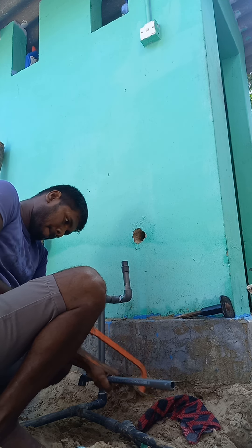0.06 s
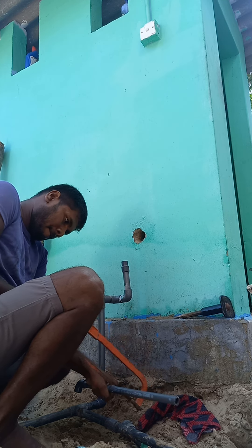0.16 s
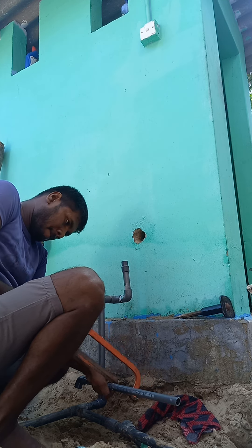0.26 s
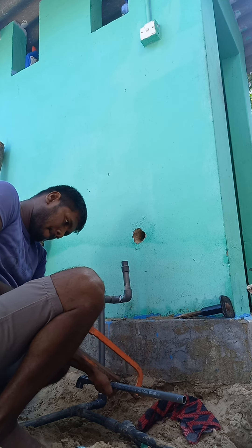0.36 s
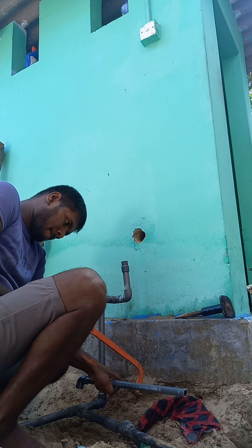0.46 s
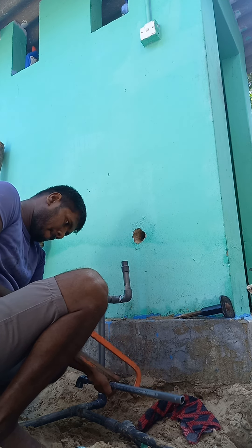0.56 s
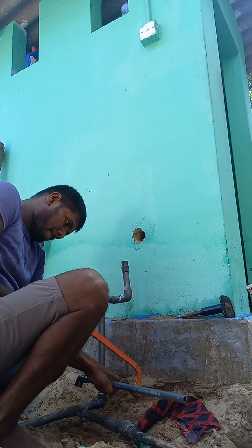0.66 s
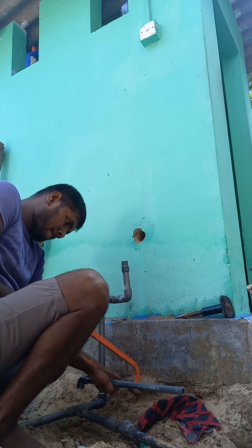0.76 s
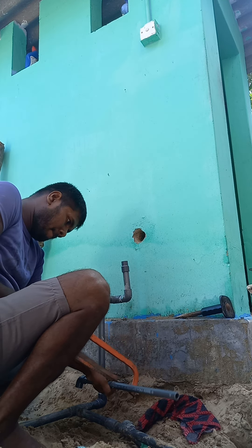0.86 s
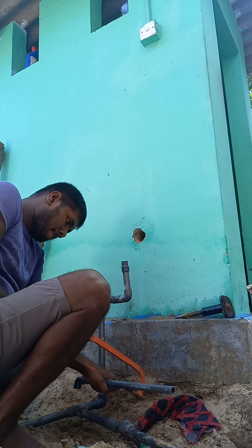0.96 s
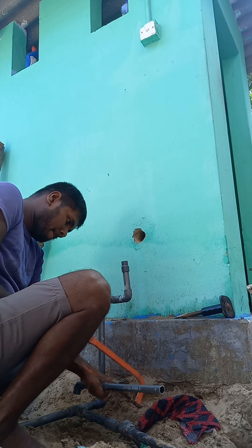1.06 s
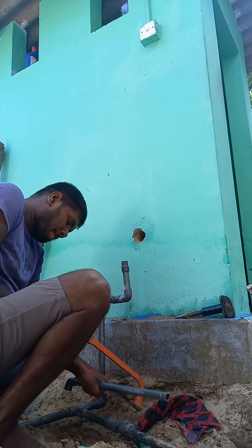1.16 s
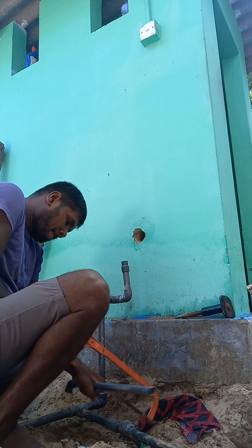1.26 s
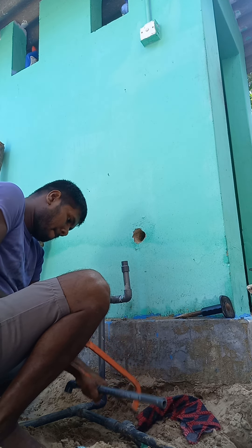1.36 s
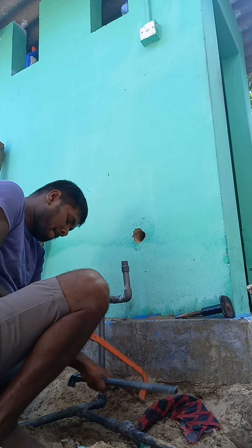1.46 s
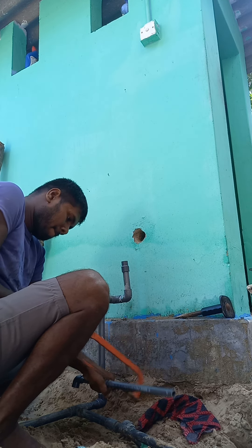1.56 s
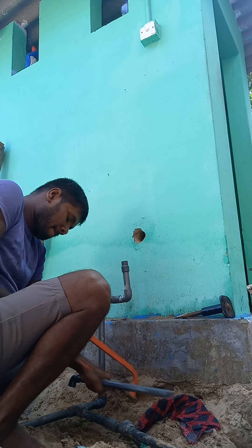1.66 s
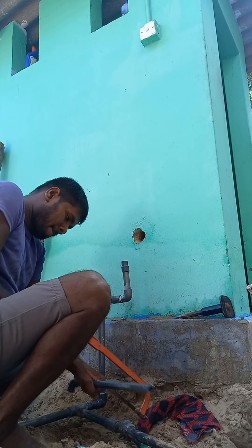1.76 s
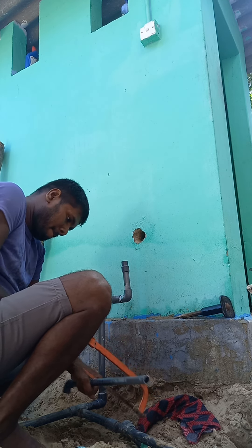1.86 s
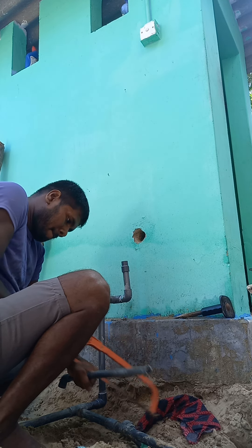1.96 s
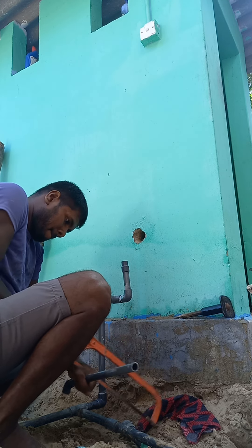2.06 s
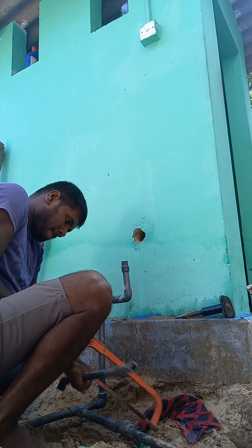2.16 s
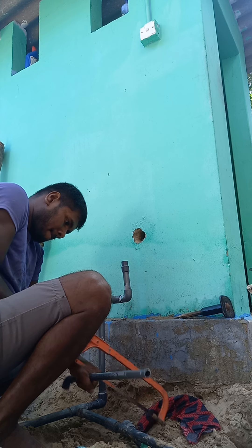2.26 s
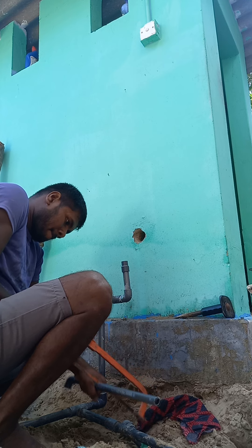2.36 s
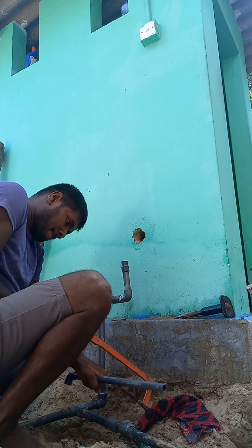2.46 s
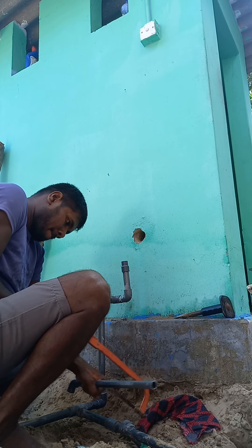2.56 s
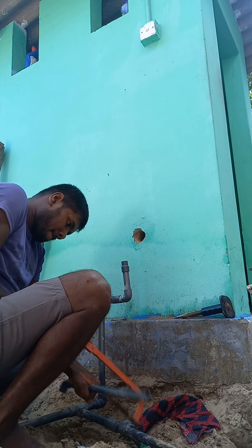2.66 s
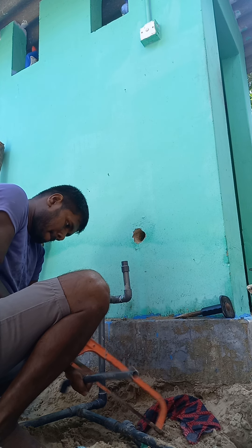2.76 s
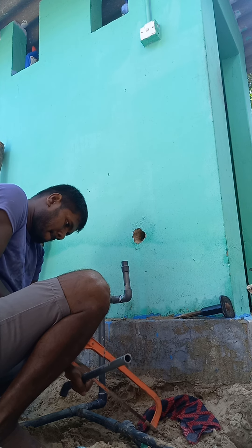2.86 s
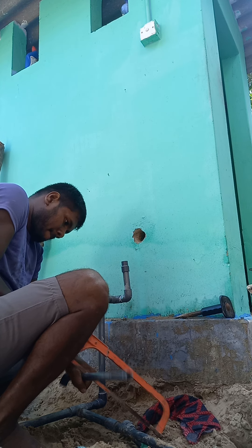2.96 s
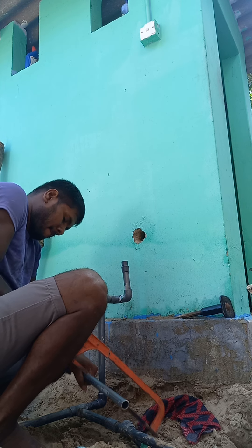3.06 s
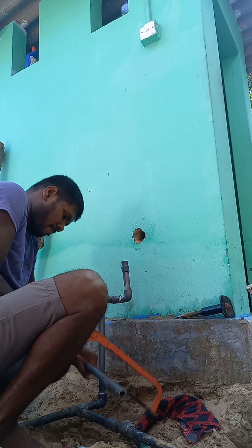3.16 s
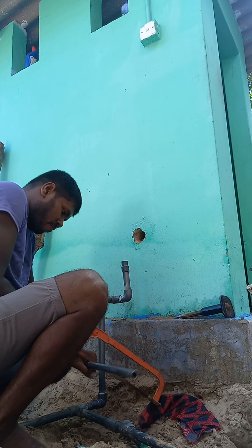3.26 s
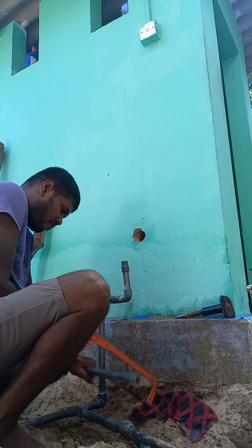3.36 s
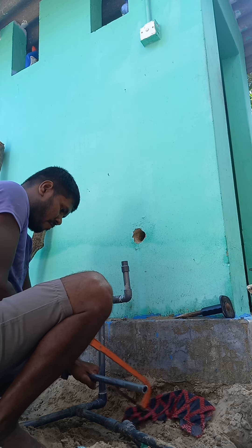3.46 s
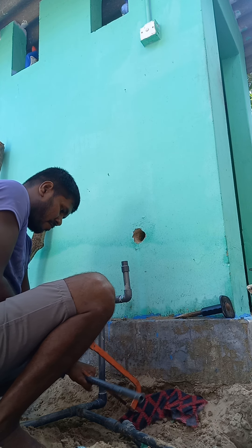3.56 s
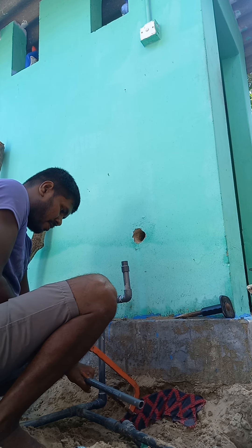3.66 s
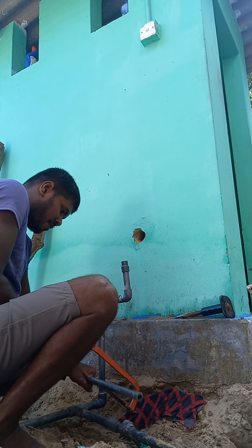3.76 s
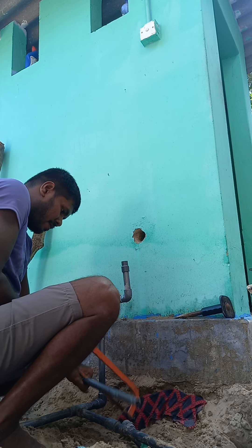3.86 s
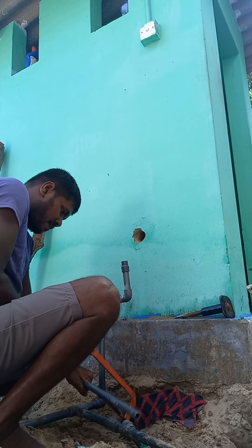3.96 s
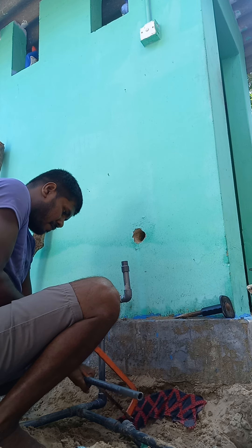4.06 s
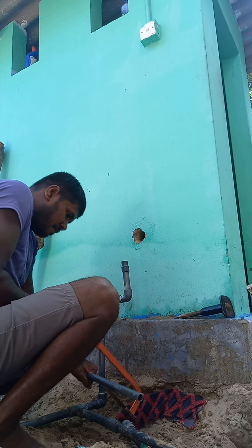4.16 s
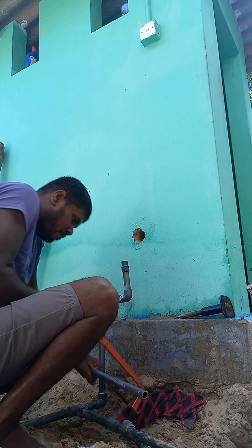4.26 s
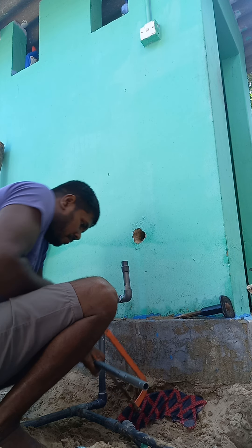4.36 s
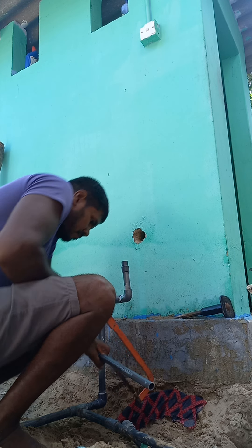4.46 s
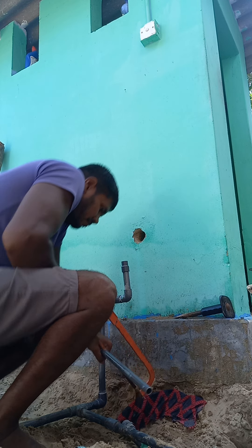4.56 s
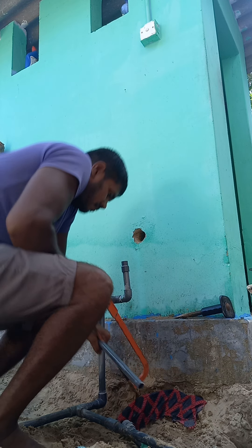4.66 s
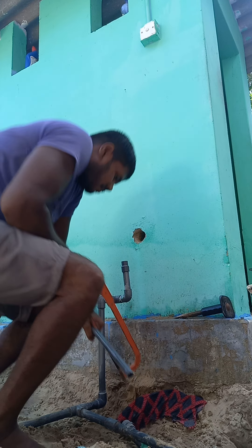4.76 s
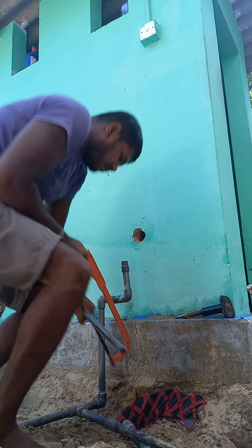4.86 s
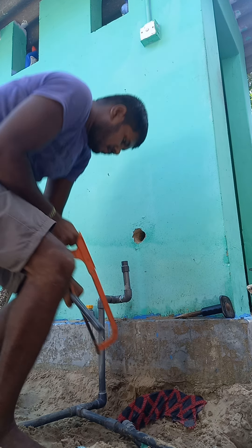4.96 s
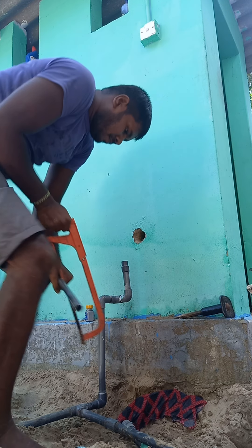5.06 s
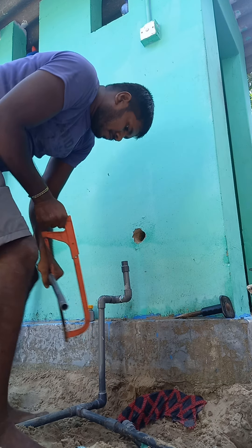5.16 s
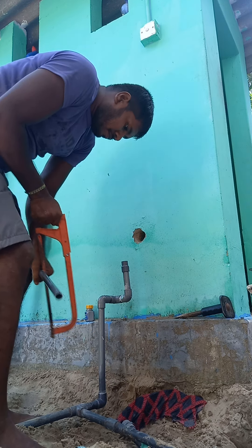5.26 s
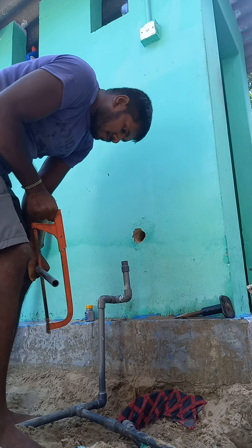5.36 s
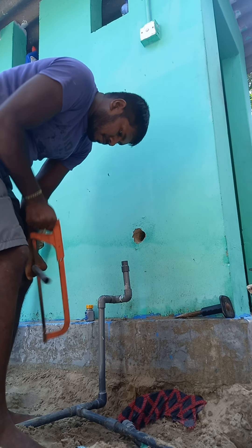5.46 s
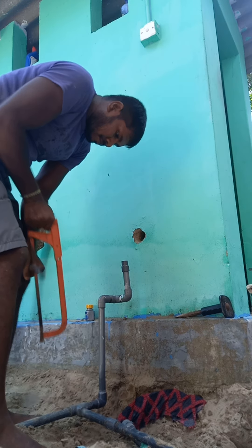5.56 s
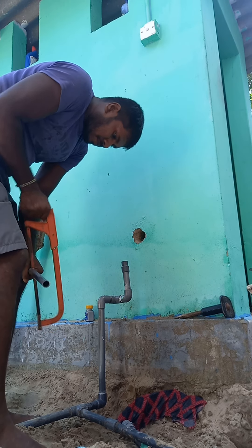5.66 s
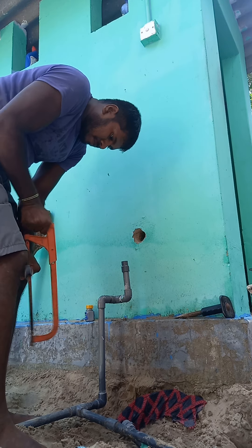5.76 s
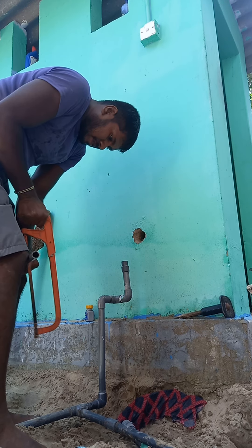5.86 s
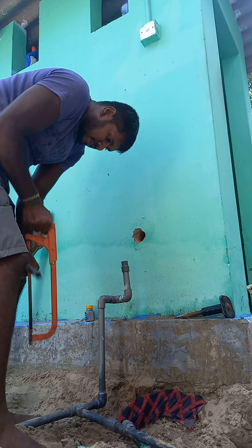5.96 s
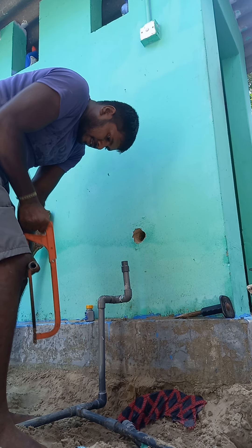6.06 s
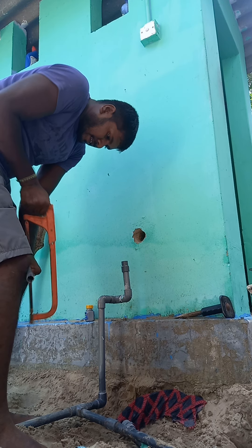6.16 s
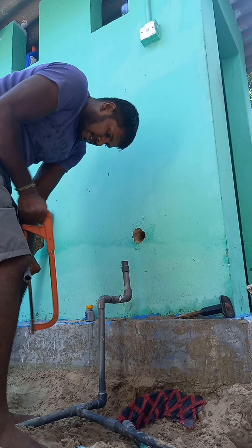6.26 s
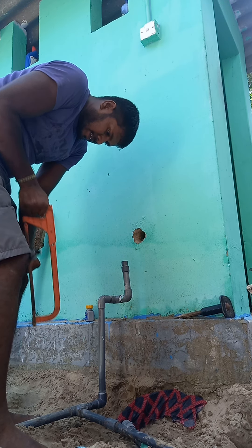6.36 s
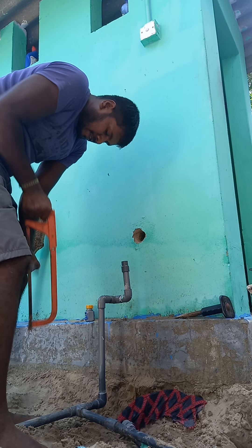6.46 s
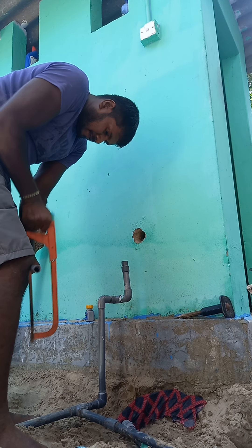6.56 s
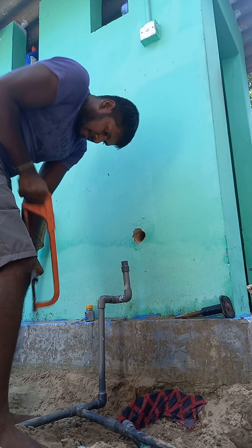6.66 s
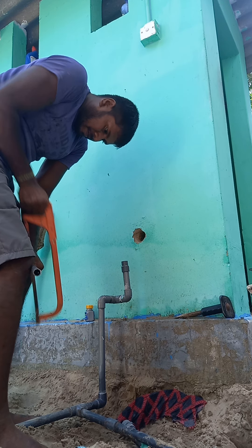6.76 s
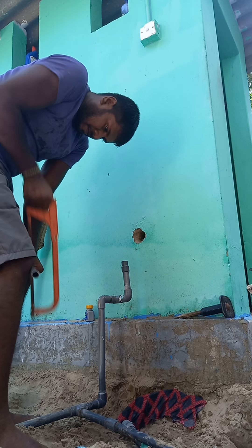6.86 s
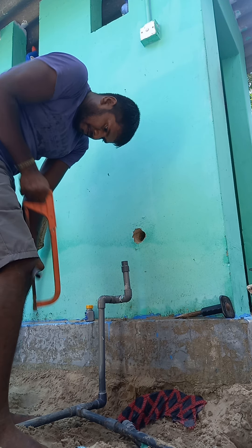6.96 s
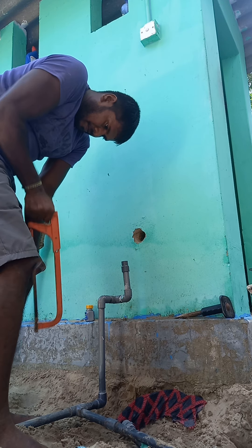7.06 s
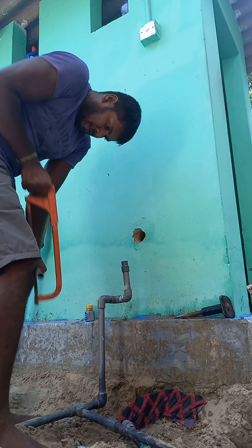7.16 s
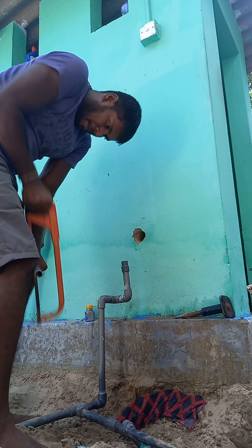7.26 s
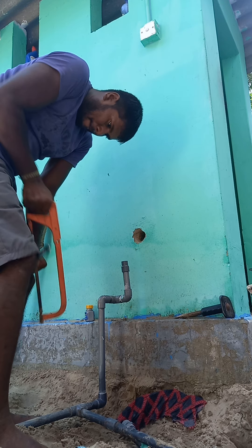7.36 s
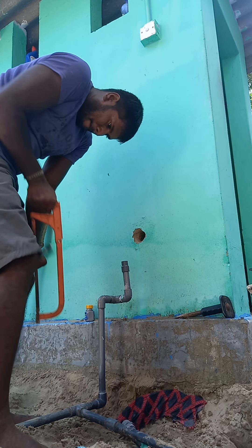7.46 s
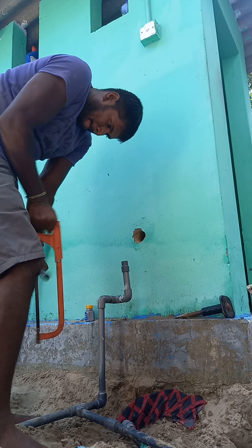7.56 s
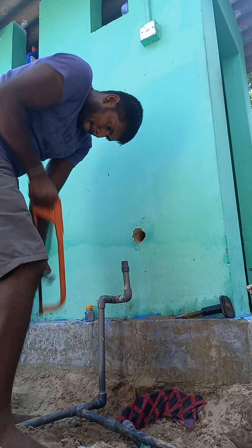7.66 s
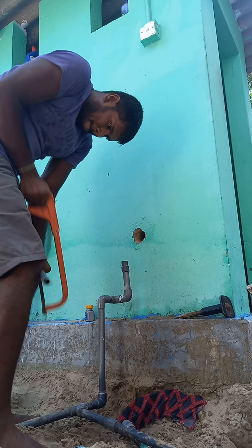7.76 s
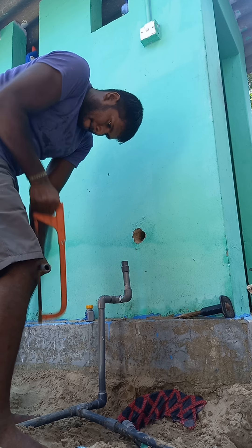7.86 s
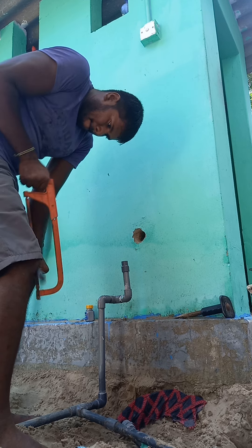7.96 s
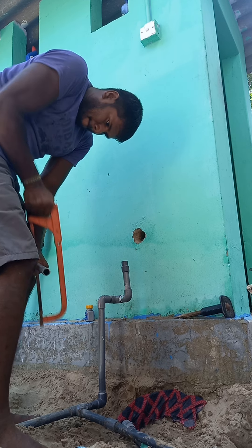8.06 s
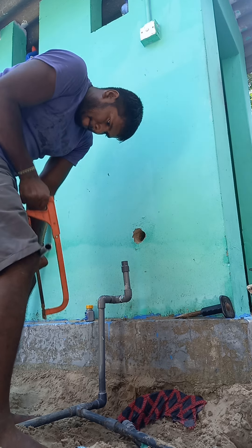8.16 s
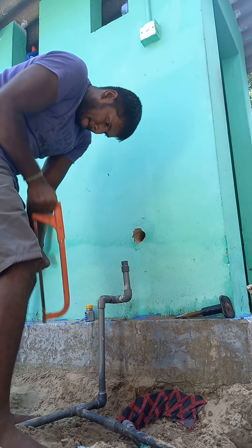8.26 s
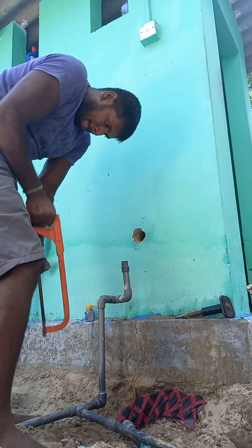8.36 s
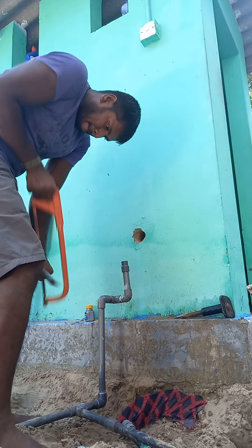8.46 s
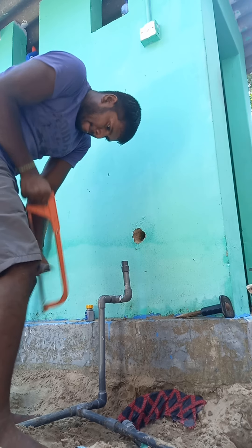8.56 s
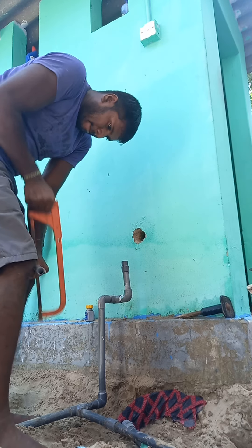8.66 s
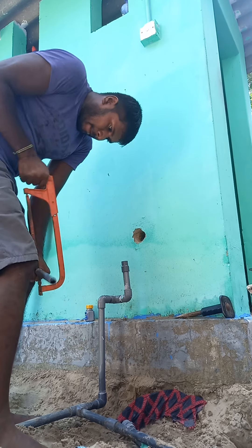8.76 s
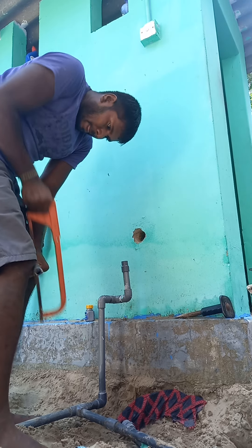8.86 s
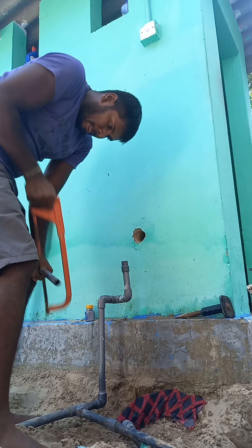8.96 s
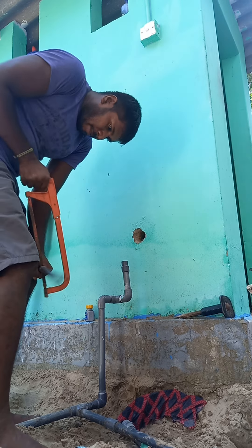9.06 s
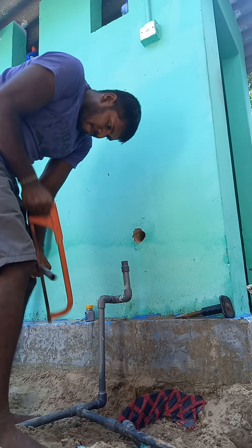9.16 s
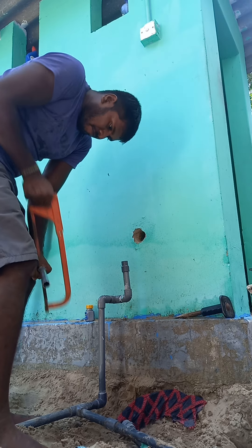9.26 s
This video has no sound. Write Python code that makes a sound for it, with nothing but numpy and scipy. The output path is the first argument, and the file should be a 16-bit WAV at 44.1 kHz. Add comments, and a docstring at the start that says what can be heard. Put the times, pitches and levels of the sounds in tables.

```python
"""A hacksaw cuts plastic pipe in quick strokes beside a house wall: toothed friction excites pipe resonances.
From the start there is a faint outdoor rumble of filtered noise, rough crow caws and a narrow insect tone that
soon stops; the pipe is sawn near the ground. In a pause come sine whistles of a small bird, rustles and taps.
Then the pipe is held higher and sawn in denser strokes, with knocks of the saw frame as ringing impacts
and dull bumps; crows go on calling in the distance."""
import sys
import numpy as np
from scipy import signal
from scipy.fft import rfft, irfft, next_fast_len
from scipy.io import wavfile

SR = 44100
rng = np.random.default_rng(int(sys.argv[2]) if len(sys.argv) > 2 else 0)


def wav_record(signal):
    """Record a signal, one row per channel, as 16-bit PCM in the file named by sys.argv[1]."""
    frames = np.transpose(np.atleast_2d(signal))
    bounded = np.clip(frames, -1, 1)
    # unit amplitude maps onto the largest positive 16-bit level
    quanta = np.round(bounded * 32767).astype(np.int16)
    wavfile.write(sys.argv[1], SR, quanta)


N = 410571
TIME = np.arange(N) / SR  # s
STROKE_SIZE = 16384  # samples computed for each stroke
STROKE_BINS_HZ = np.fft.rfftfreq(STROKE_SIZE, 1 / SR)
LIFTED_S = 4.5  # crouched before this time, standing after it


def amp(db):
    """Level definition: decibels to amplitude gain."""
    return 10 ** (np.asarray(db) / 20)


def unit(x):
    """Power normalisation: scales to rms 1."""
    return x / np.sqrt(np.mean(x ** 2) + 1e-20)


def read(points, hz):
    """Interpolation of a spectrum table on a logarithmic frequency axis."""
    f, value = np.transpose(points)
    return np.interp(np.log(hz + 1), np.log(f + 1), value)


def add(mix, s, sound):
    """Superposition: adds a sound to the mix at time s."""
    part = mix[..., max(round(s * SR), 0):][..., :sound.shape[-1]]
    part += sound[..., :part.shape[-1]]


def colour(x, points):
    """Spectral shaping by a table; white noise keeps its power."""
    size = next_fast_len(x.shape[-1])
    gain = unit(amp(read(points, np.fft.rfftfreq(size, 1 / SR))))
    spectrum = rfft(np.float32(x), size) * np.float32(gain)
    return irfft(spectrum, size)[..., :x.shape[-1]]


def ring(x, modes):
    """Modal resonance: convolves x with decaying cosines; white noise keeps its power."""
    t = np.arange(2048) / SR
    body = sum(amp(db) * width * np.exp(-np.pi * width * t) * np.cos(2 * np.pi * hz * t)
               for hz, width, db in modes)
    body = body / np.linalg.norm(body)
    return np.apply_along_axis(signal.oaconvolve, -1, x, body)[..., :x.shape[-1]]


def lowcut(x, hz):
    """Radiation efficiency: small, thin parts radiate little bass."""
    return signal.sosfilt(signal.butter(3, hz, "high", fs=SR, output="sos"), x)


def drift(size, per_s):
    """Slow random modulation: straight lines between normal draws, per_s of them a second."""
    knots = rng.standard_normal(size // 8 + 2)
    at = np.arange(size) * min(per_s / SR, 1 / 8)
    return np.interp(at, np.arange(len(knots)), knots)


def two_ears(size, shared):
    """Interaural coherence: white noise of which the ears share a given part of the power."""
    shared = np.clip(shared, 0, 1)
    common = rng.standard_normal(size)
    separate = rng.standard_normal((2, size))
    return np.sqrt(shared) * common + np.sqrt(1 - shared) * separate


def reflections(x, t60s, delay):
    """Diffuse reverberation: sparse echoes, different for each ear, decaying by band."""
    shape = (2, SR * 3 // 4)
    taps = rng.choice([-1., 1.], shape) * (rng.random(shape) < .15)
    hz, t, z = signal.stft(taps, SR, nperseg=128)
    decay = 1e-3 ** (t / read(t60s, hz)[:, None])  # falls 60 dB in one t60
    tail = signal.istft(z * decay, SR, nperseg=128)[1]
    tail = tail / np.linalg.norm(tail, axis=1, keepdims=True)
    tail = np.pad(tail, ((0, 0), (int(abs(delay) * SR), 0)))
    return signal.fftconvolve(np.float32(x[None]), np.float32(tail), axes=1)[:, :N]


# spectral density of the outdoor rumble and hiss: f/Hz, relative level/dB
AIR_SPECTRUM = [(25, -27.5), (62, 2), (120, -1), (200, -8), (400, -14), (800, -23), (1700, -24.5),
                (2600, -29.5), (4000, -26.5), (6000, -33), (8300, -20), (11000, -36), (16000, -38)]
AIR_DB = -65


def air():
    """Partly coherent noise field: distant rumble and faint hiss whose level wanders."""
    noise = 0.8 * rng.standard_normal(N) + 0.59 * rng.standard_normal((2, N))
    level = amp(AIR_DB + 2.4 * drift(N, 3.24))
    return level * colour(noise, AIR_SPECTRUM)


INSECT_DB, INSECT_STOP_S, INSECT_FADE_S = -60, 1.5, .2  # level before the echo mix
# bird whistles, levels before the echo mix: start t/s, length t/s, level/dB, f/Hz
BIRD_WHISTLES = [(3.33, 0.19, -68.5, 1140), (3.85, 0.13, -61.5, 1133), (3.96, 0.069, -68, 1118)]


def bird_and_insect():
    """Narrow-band noise gives a fuzzy insect tone; frequency-modulated sines give soft whistles."""
    fade = np.clip((INSECT_STOP_S - TIME) / INSECT_FADE_S, 0, 1)
    band = [(3000, -54.0), (3650, -23.0), (3770, -3), (3830, 1.5), (3950, -26), (4600, -57)]  # f/Hz, dB
    out = amp(INSECT_DB) * fade * colour(rng.standard_normal(N), band)
    for s, length, db, hz in BIRD_WHISTLES:
        size = int(length * SR)
        turns = np.cumsum(hz * (1 + 0.0093 * drift(size, 97))) / SR
        add(out, s, amp(db) * unit(np.sin(2 * np.pi * turns) * np.hanning(size)))
    return 0.54 * out + .5 * reflections(out, [(1000, 0.36), (4000, 0.93)], 0.022)


# crow calls, levels before the echo mix: start t/s, length t/s, level/dB, factor on the throat frequencies
CROW_CALLS = [(0, 0.17, -52, 0.99), (1.331, 0.22, -55, 0.98), (1.848, 0.25, -68, 1.07),
              (2.643, 0.21, -54.5, 0.97), (3.486, 0.28, -52.5, 1.04), (3.819, 0.24, -59.5, 1.13),
              (4.33, 0.22, -56.5, 0.99), (4.598, .24, -64.5, 1.07), (5.325, 0.23, -54.5, 1.04),
              (6.408, .24, -54.5, 1), (8.659, 0.15, -41.5, 1.12)]
# throat resonances before that factor: f/Hz, width f/Hz, relative level/dB
THROAT_MODES = [(960, 89, -12.5), (1534, 140, 10.5), (1764, 130, 12)]
CAW_START_HZ = 491.5


def crows():
    """Source-filter principle: noisy harmonics through throat resonances, far off among houses."""
    out = np.zeros(N)
    for s, length, db, throat in CROW_CALLS:
        u = np.linspace(0, 1, int(length * SR))
        # the pitch rises slightly, then falls, with a rough wobble
        pitch = CAW_START_HZ * (1 + .12 * u - .22 * u ** 2) * (1 + 0.046 * drift(len(u), 348.6))
        turns = np.cumsum(pitch) / SR
        harmonics = unit(sum(np.cos(2 * np.pi * k * turns) for k in range(2, 6)))
        voice = harmonics * (1 + 0.35 * drift(len(u), 298))
        breath = 4.0 * rng.standard_normal(len(u))
        modes = [(f * throat, width, mode_db) for f, width, mode_db in THROAT_MODES]
        caw = ring(voice + breath, modes)
        caw = signal.sosfilt(signal.butter(6, [800, 2050], "band", fs=SR, output="sos"), caw)
        add(out, s, amp(db) * unit(caw) * signal.windows.tukey(len(u), .35))
    return 0.52 * out + 0.83 * reflections(out, [(1000, 0.16), (2000, 0.69)], .02)


# shifts of the body that rustle clothes and sand: middle t/s, length t/s, level/dB at the middle
BODY_SHIFTS = [(3.263, 0.27, -67.5), (3.802, 0.84, -72.5), (4.473, 0.34, -66), (4.726, 0.44, -68.5),
               (5.012, 0.17, -64)]


def rustle():
    """Granular friction: randomly gated noise swells and fades as the body shifts."""
    swell = np.zeros(N)
    for s, length, db in BODY_SHIFTS:
        add(swell, s - length / 2, amp(db) * np.sin(np.linspace(0, np.pi, int(length * SR))))
    grains = two_ears(N, 0.41) * unit(amp(3.4 * drift(N, 300)))
    spectrum = [(300, -7.0), (1500, -7), (4000, 2.0), (6000, -5.5), (8500, 1), (11000, -6), (15000, -13)]
    return swell * colour(grains, spectrum)


# dull low bumps: shuffles in the pause, then thumps that go with the loudest frame knocks: onset t/s, level/dB
# at the top of the envelope
LOW_BUMPS = [(3.67, -66.5), (4.35, -69), (7.15, -53), (7.92, -54.5), (8.44, -60)]
BUMP_RISE_S = 0.034


def bumps():
    """Soft impact: low-frequency noise under a critically damped pulse envelope."""
    envelope = np.zeros(N)
    age = TIME[:SR] / BUMP_RISE_S
    for s, db in LOW_BUMPS:
        add(envelope, s, amp(db) * age * np.exp(1 - age))
    spectrum = [(30, -27.5), (85, 1), (130, -5), (220, -5.5), (400, -24), (1500, -51)]  # f/Hz, dB
    return envelope * colour(rng.standard_normal(N), spectrum)


# modes that ring in a knock or tap: f/Hz, width f/Hz, relative level/dB
FRAME_MODES = [(1400, 300, -47), (2160, 110, -34), (3200, 97, 11.5), (4450, 2800, 7), (6860, 190, 8),
               (8140, 790, 18), (10000, 1200, 5.5), (14100, 1200, 6)]


def knock(db, length):
    """Impact excitation: a brief rattle of contacts rings the resonances of frame and pipe."""
    t = np.arange(SR // 20) / SR
    contacts = two_ears(len(t), .5) * unit(amp(1.5 * drift(len(t), 2500)))
    sound = lowcut(ring(contacts * np.exp(-(t / length) ** 3), FRAME_MODES), 760)
    # the peak is taken as 2.88 times the rms of the first 200 samples
    return amp(db) * sound / (2.88 * np.sqrt(np.mean(sound[:, :200] ** 2)))


# saw frame meets pipe: t/s, nominal peak level/dB, rattle length t/s
FRAME_KNOCKS = [(0.05, -24.5, 0.0068), (3.434, -29, 0.0081), (3.540, -21.5, 0.0054), (5.613, -40.5, 0.0067),
                (6.1354, -20.5, 0.0085), (6.17, -14, 0.004), (6.669, -16, 0.0077), (6.895, -25.5, 0.015),
                (6.927, -16.5, 0.0081), (7.15, -6.5, 0.0092), (7.4939, -13, 0.0053), (7.585, -45, 0.0067),
                (7.6509, -12, 0.0069), (7.85, -11, 0.0039), (7.926, -8, 0.0098), (8.179, -17, 0.0077),
                (8.4489, -11, 0.0079), (8.5697, -27.5, 0.0064)]
# crumbs and small taps while the pipe is handled: t/s, nominal peak level/dB
SMALL_TAPS = [(3.8346, -45), (3.904, -48), (3.9713, -51), (4.477, -44.5), (4.516, -35.5), (5.345, -44.5)]


def handling():
    """Superposition of impacts and friction: frame knocks, 1 ms taps, rustle and bumps."""
    out = np.zeros((2, N))
    for s, db, length in FRAME_KNOCKS:
        add(out, s, knock(db, length))
    for s, db in SMALL_TAPS:
        add(out, s, knock(db, .001))
    return out + rustle() + bumps()


def pipe_response(modes):
    """Modal superposition: complex response of damped resonances, with unit power gain."""
    response = sum(amp(db) / (1 + 2j * (STROKE_BINS_HZ - hz) / width) for hz, width, db in modes)
    # a thin pipe radiates little bass
    response = response * STROKE_BINS_HZ ** 3 / (STROKE_BINS_HZ ** 3 + 280 ** 3)
    return response / np.sqrt(np.mean(abs(response) ** 2))


BITE_S = 0.025  # the blade skims this long before the teeth bite
FASTEST = .47  # share of a stroke after which the blade is fastest
SAG_PER_S = 3  # the teeth drag, so their rate sags through a stroke (e-folds a second)


def stroke(row, rasp, pipe, treble_db, jitter=.05, grit_db=2.52, chip_db=1.25, skim=0.57, swell=1.58,
           buzz_noise=0.74):
    """Toothed friction: teeth catch at a rate tied to blade speed, tearing chips and kicking the pipe."""
    start, length, tooth_hz, db, pipe_db, note_db = row
    bite, fastest, end = start + BITE_S, start + FASTEST * length, start + length
    t = max(start, 0) + np.arange(STROKE_SIZE) / SR
    speed = abs(np.sin(np.interp(t, [start, fastest, end], [0, np.pi / 2, np.pi])))
    force = speed ** swell * np.interp(t, [bite - .002, bite + 0.008], [skim, 1])
    force *= unit(amp(grit_db * drift(STROKE_SIZE, 190.2)))  # the blade judders in the slot

    rate = tooth_hz * (.55 + .45 * speed) * np.exp(-SAG_PER_S * (t - fastest))
    teeth = np.cumsum(rate * (1 + jitter * drift(STROKE_SIZE, 350))) / SR  # count of teeth passed
    catches = np.diff(np.floor(teeth), prepend=0)
    kicks = catches * np.sqrt(SR / rate) * (1 + 0.59 * rng.standard_normal(STROKE_SIZE))
    # tearing is loudest just after a tooth catches; chips differ in size
    tearing = 0.5 + 1.5 * np.exp(-(teeth % 1) / 0.41)
    chips = unit(amp(chip_db * drift(STROKE_SIZE, 1400)) * tearing)

    hiss, body = two_ears(STROKE_SIZE, .4), two_ears(STROKE_SIZE, .75)
    treble = unit(amp(treble_db * np.clip((STROKE_BINS_HZ - 4500) / 3500, 0, 1)))
    scrape = rfft(force * (chips * hiss + 0.16 * kicks)) * rasp * treble
    buzz = rfft(force * (0.49 * kicks + buzz_noise * chips * body)) * pipe * amp(pipe_db)

    # the wall sings a husky note: three harmonics of the tooth rate, each fluctuating
    note = 0
    for k, k_db in enumerate([0, -11, -14], 1):
        wander = 0.5 + .5 * drift(STROKE_SIZE, 218) + .5j * drift(STROKE_SIZE, 214.7)
        note = note + amp(k_db) * (np.exp(2j * np.pi * k * teeth) * wander).real
    return t[0], amp(db) * (irfft(scrape + buzz) + amp(note_db) * force * speed * note)


# saw strokes: start t/s, length t/s, nominal tooth rate f/Hz (before jitter, where the blade is fastest),
# rasp level/dB, then relative to it: pipe buzz level/dB (before the buzz gain), tooth note level/dB
SAW_STROKES = [(-0.04, 0.092, 400.5, -44, -9, -27.5), (0.022, 0.19, 477, -30, -25.5, -30.5),
               (0.156, 0.15, 379.5, -36.5, -13.5, -5.5), (0.952, .117, 519.3, -33.5, -17.5, -21),
               (1.027, .1, 402, -52.5, -7.5, -22.5), (1.202, .112, 846, -30, -18, -15),
               (1.313, 0.12, 421.4, -25, -12, -18), (1.569, .098, 549, -30, -18.5, -16.5),
               (1.681, .122, 528, -26, -17.5, -39.5), (1.957, 0.11, 851, -27, -26.5, -17),
               (2.321, 0.11, 800, -27, -20, -24.5), (2.72, 0.11, 1019, -27, -26, -6),
               (3.443, 0.13, 426, -38.5, -23.5, -26), (5.454, 0.1, 520, -35.5, -11.5, -26),
               (5.608, 0.11, 499, -30, -18.5, -33), (5.715, 0.11, 894, -31, -21, -31),
               (6.132, .1, 594, -25, -18, -32), (6.245, 0.093, 560, -26.5, -11.5, -20),
               (6.527, 0.081, 797, -29, -19.5, -36), (6.628, .12, 1001, -21, -20.5, -43),
               (6.738, 0.13, 1101, -26.5, -20, -26), (6.885, .11, 903.5, -29, -17, -36),
               (6.994, 0.14, 1103, -26, -21, -32), (7.133, 0.13, 1000, -24, -14, -32),
               (7.258, 0.12, 993, -22, -19.5, -10), (7.548, .06, 807, -24.5, -19, -17.5),
               (7.64, 0.15, 998, -27.5, -17, -19), (7.772, .14, 689, -25, -12.5, -8),
               (7.895, 0.13, 897, -28, -13.5, -30), (8.013, 0.14, 953, -27, -23.5, -12),
               (8.336, 0.078, 709, -33.5, -19.5, -13.5), (8.435, 0.13, 1100, -29.5, -18, -18),
               (8.551, 0.16, 1011, -31.5, -22.5, -26), (8.687, .16, 1009, -33.5, -22, -13),
               (8.815, 0.16, 952, -32, -28.5, -16.5), (8.956, .17, 897, -37.5, -24, -40),
               (9.129, 0.14, 748, -35, -39, -25), (9.258, 0.12, 795, -41.5, -20, -29)]
# blade rasp spectra, crouched and standing: f/Hz, relative density level/dB
RASP_CROUCHED = [(200, -25), (700, -24.5), (1300, -10), (1750, -4), (2450, -13), (3100, -5), (4100, 2),
                 (5000, -2.5), (6300, -4), (6750, -4), (7800, 0.5), (10000, -5.5), (13000, -5.5),
                 (15500, -2.5)]
RASP_STANDING = [(200, -29.5), (700, -17), (1250, -7.5), (1550, -3.5), (2250, -5.5), (2750, -0.5),
                 (3600, -1), (6250, -4.5), (6750, 1.5), (7200, -6), (7900, 4), (9500, -1.5), (13000, -7),
                 (15500, 2.5)]
# pipe resonances, crouched and standing: f/Hz, width f/Hz, relative level/dB
PIPE_CROUCHED = [(371, 47, 8.5), (528, 130, -3), (864, 61, -7.5), (1009, 49, -2.5), (1710, 350, -8.5)]
PIPE_STANDING = [(426, 109, 2.5), (590, 180, -5), (851, 36, -4), (1061, 35, 3.5), (1442, 67, 5.5),
                 (2600, 105, 5), (3070, 34, -3.5), (3963, 47, 2)]
BUZZ_CROUCHED_DB, BUZZ_STANDING_DB = 2.0, 4.5
TREBLE_CROUCHED_DB, TREBLE_STANDING_DB = 0.14, -1.87  # tilt of the rasp from 4.5 to 8 kHz


def sawing():
    """Boundary conditions set the modes: the pipe rings differently once lifted and held near the cut."""
    out = np.zeros((2, N))
    rasp_crouched = unit(amp(read(RASP_CROUCHED, STROKE_BINS_HZ)))
    rasp_standing = unit(amp(read(RASP_STANDING, STROKE_BINS_HZ)))
    pipe_crouched = amp(BUZZ_CROUCHED_DB) * pipe_response(PIPE_CROUCHED)
    pipe_standing = amp(BUZZ_STANDING_DB) * pipe_response(PIPE_STANDING)
    crouched = rasp_crouched, pipe_crouched, TREBLE_CROUCHED_DB
    standing = rasp_standing, pipe_standing, TREBLE_STANDING_DB
    for row in SAW_STROKES:
        posture = crouched if row[0] < LIFTED_S else standing
        add(out, *stroke(row, *posture))
    return out


# reverberation of wall and yard: f/Hz, t60 t/s
YARD_DECAY = [(250, 0.23), (700, 0.25), (1800, 0.28), (4500, 0.2), (9000, 0.18), (16000, 0.2)]
LAG_CROUCHED_S, LAG_STANDING_S = .00019, .00007  # the left ear hears the work this much later


def scene():
    """Interaural delay puts the close work to the right, less so once lifted; wall and yard add a tail."""
    left, right = sawing() + handling()
    lag = np.where(TIME < LIFTED_S, round(LAG_CROUCHED_S * SR), round(LAG_STANDING_S * SR))
    direct = np.array([left.take(np.arange(N) - lag, mode="clip"), right])
    tail = amp(-10.5) * reflections(right, YARD_DECAY, .006)
    return direct + tail + crows() + bird_and_insect() + air()


# interaural level difference: f/Hz, left minus right level/dB
LEFT_MINUS_RIGHT = [(100, 0.5), (250, -1), (600, -1.5), (1100, 1.5), (1600, 0.5), (2800, -5), (5000, -5),
                    (6600, -3), (8000, -14.5), (10500, -9), (15500, -10.5)]
EDGE_HZ = 15950  # upper band limit


def record(dry):
    """Level difference by band makes the right channel brighter; a linear-phase filter limits the band."""
    size = next_fast_len(N)
    lean_db = read(LEFT_MINUS_RIGHT, np.fft.rfftfreq(size, 1 / SR))
    gains = amp([lean_db / 2, -lean_db / 2])
    gains = gains / np.sqrt(np.mean(gains ** 2, axis=0))  # mean power of the two is kept
    heard = irfft(rfft(dry, size) * gains, size)[:, :N]
    lowpass = signal.firwin(401, EDGE_HZ, window=("kaiser", 8), fs=SR)
    return signal.oaconvolve(heard, lowpass[None], "same")


dry = scene()
out = record(dry)
wav_record(out)
```